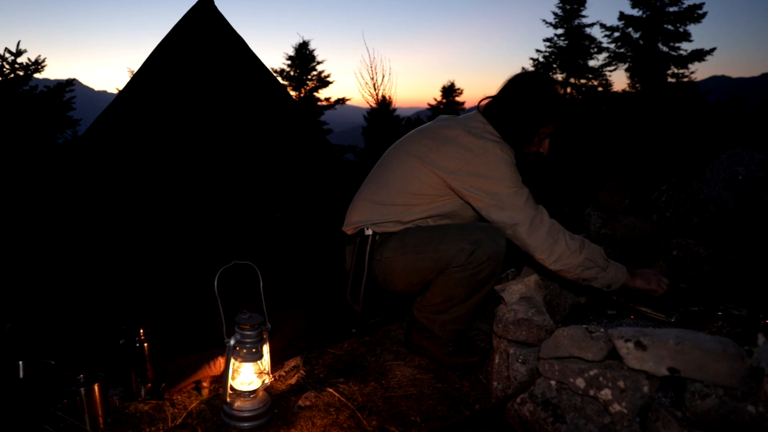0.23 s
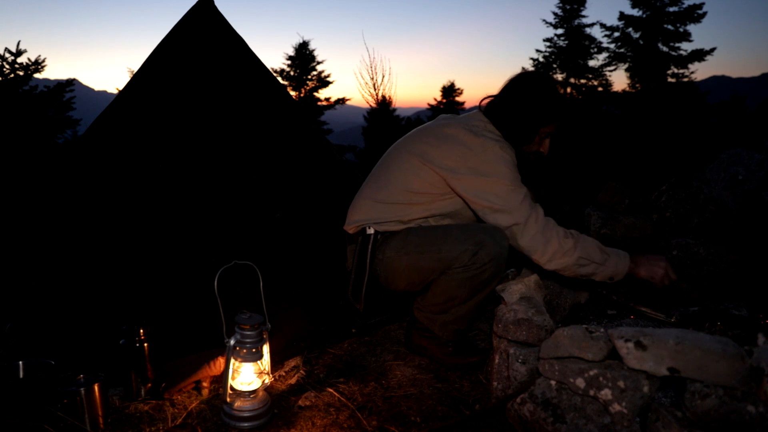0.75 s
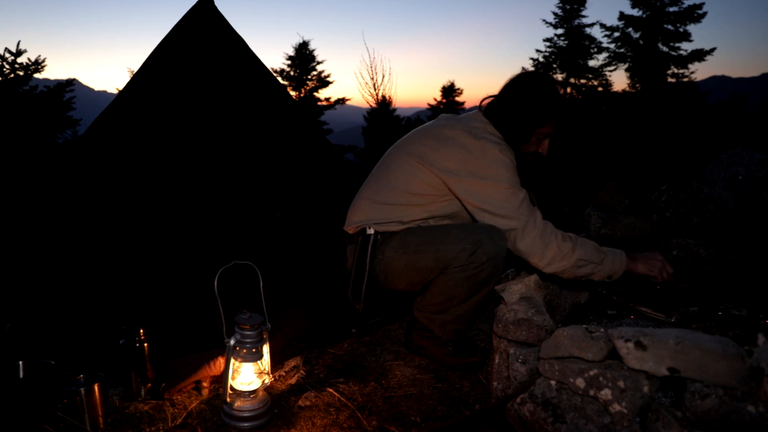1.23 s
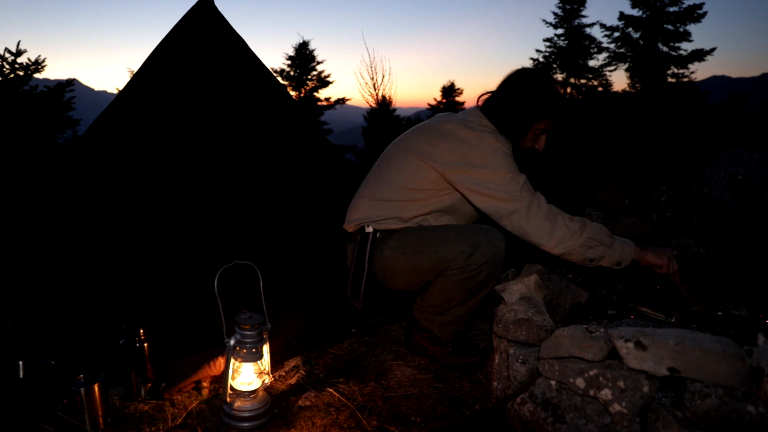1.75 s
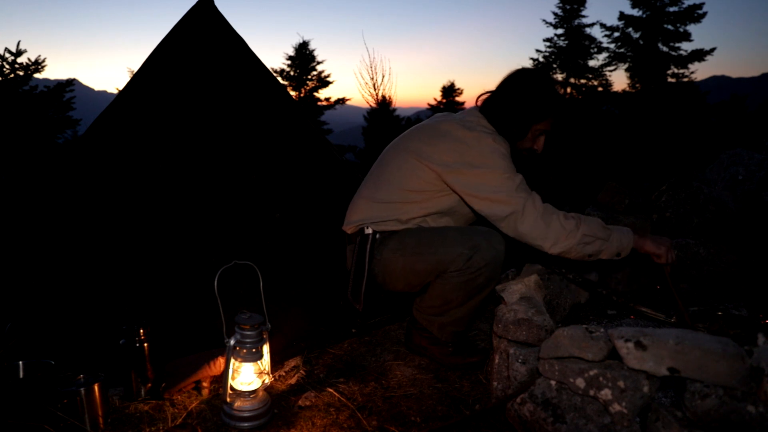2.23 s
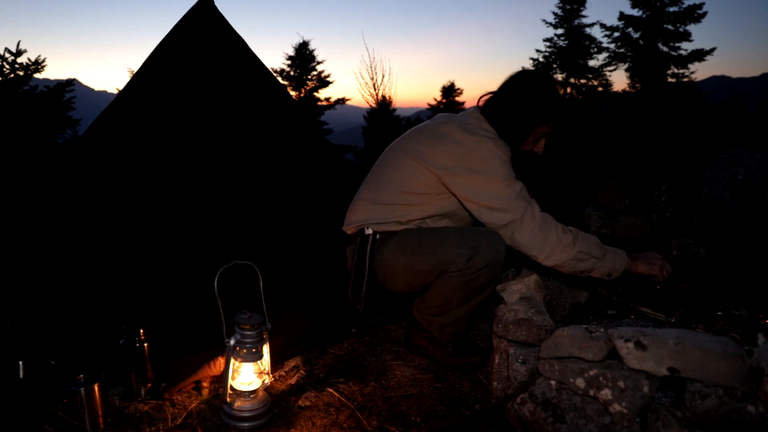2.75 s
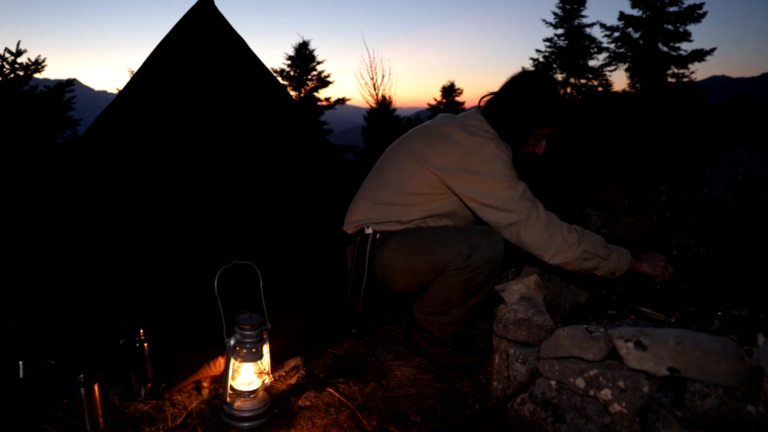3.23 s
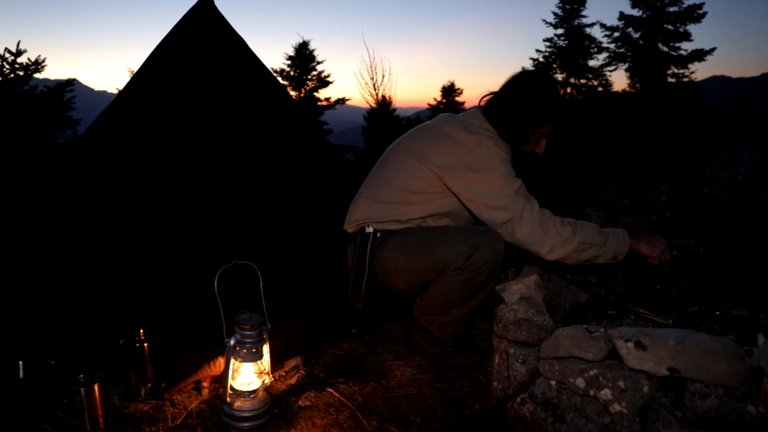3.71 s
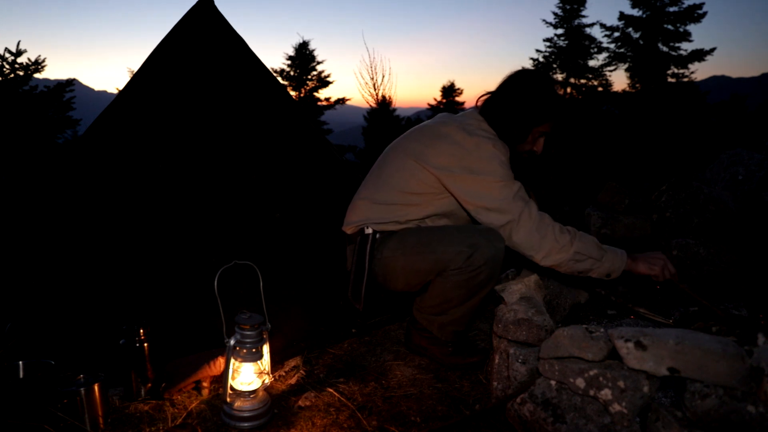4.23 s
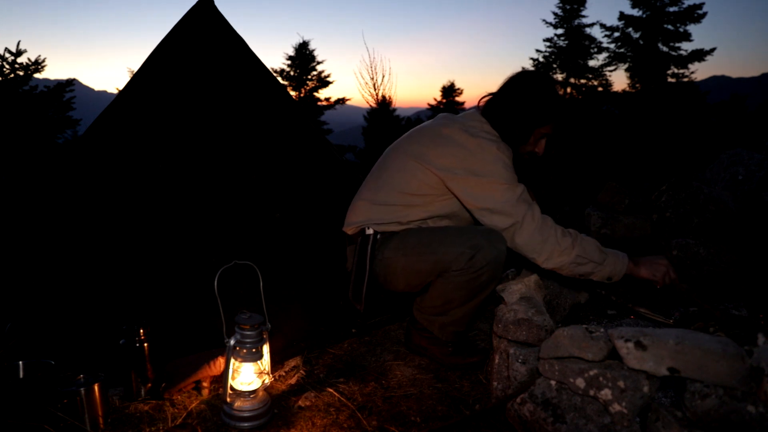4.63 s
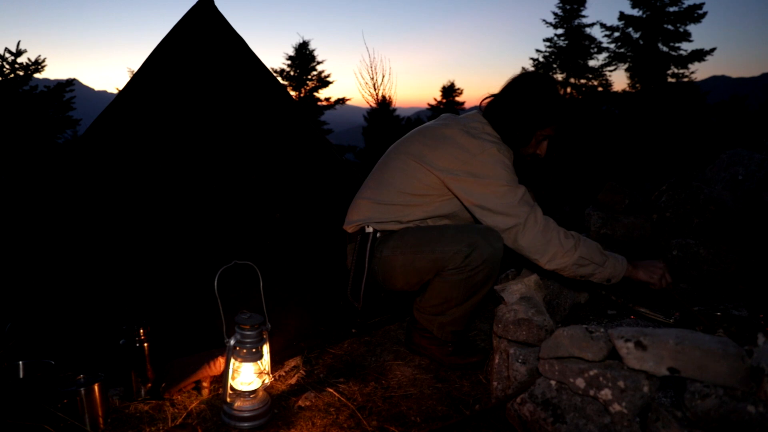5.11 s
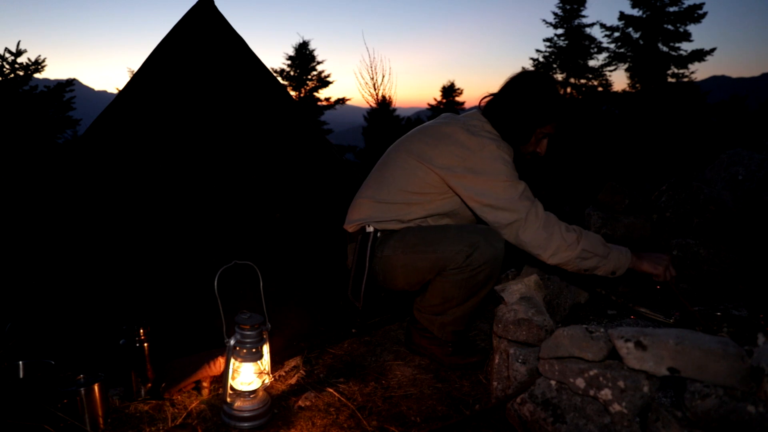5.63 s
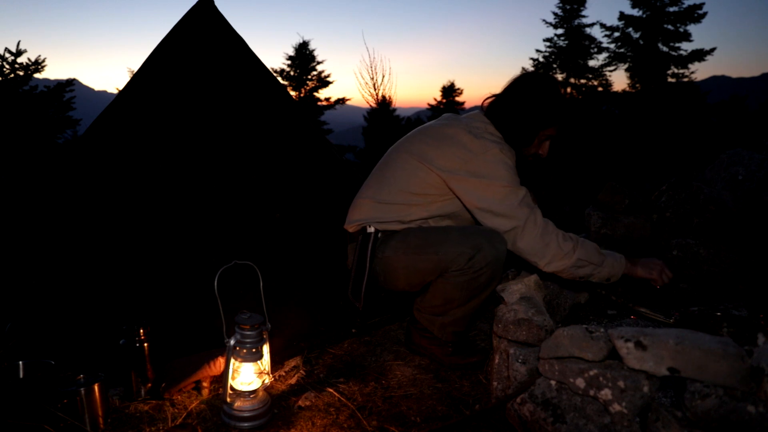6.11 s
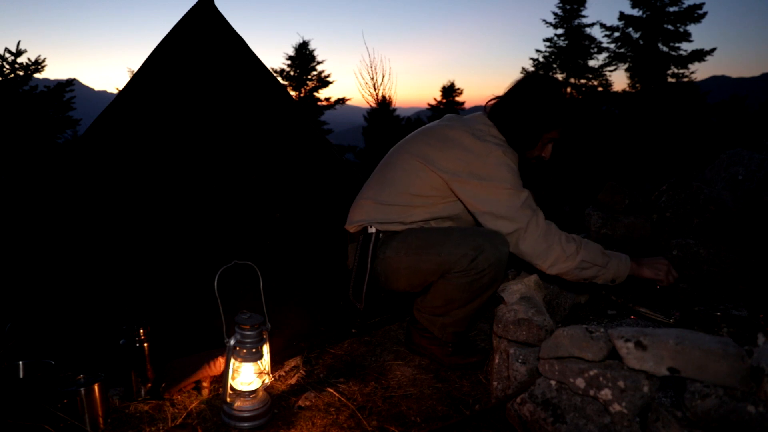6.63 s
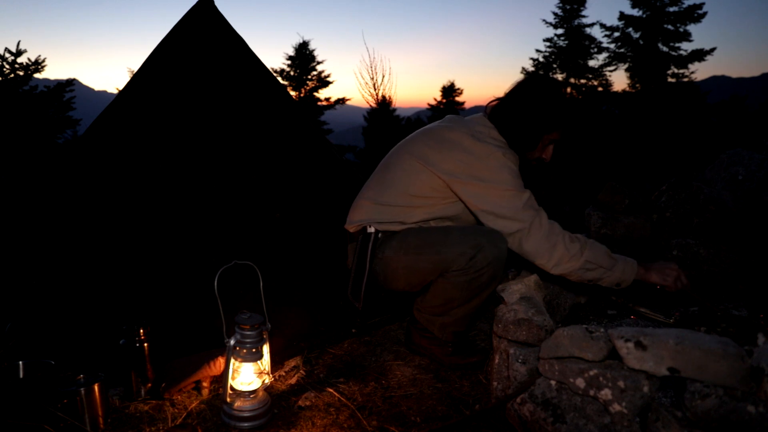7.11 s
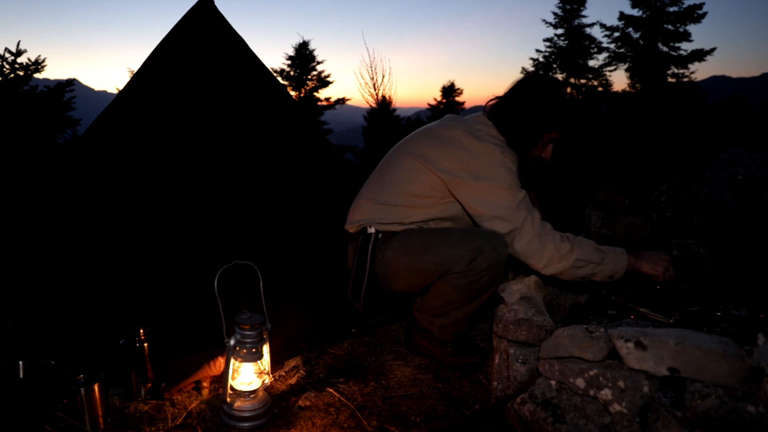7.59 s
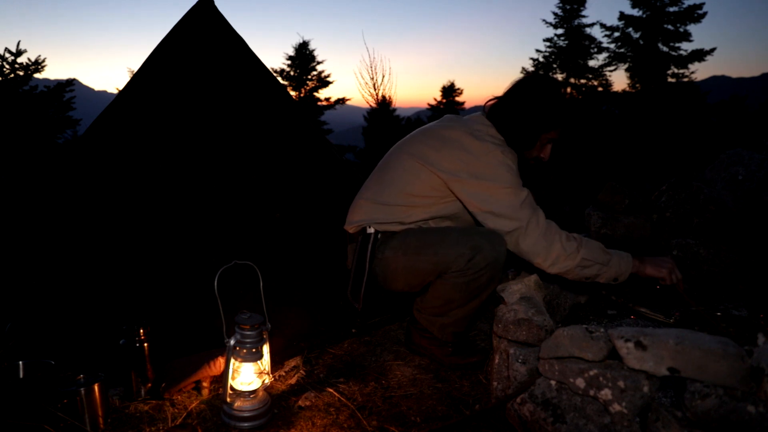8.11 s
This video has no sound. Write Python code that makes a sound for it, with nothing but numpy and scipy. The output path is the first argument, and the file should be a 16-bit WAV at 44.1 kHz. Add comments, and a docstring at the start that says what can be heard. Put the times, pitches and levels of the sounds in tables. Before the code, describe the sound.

Close, quiet frying in a small pan on campfire embers outdoors at dusk. A fine continuous sizzle swells and thins as food is stirred. Fat spits in tiny bright snaps, and a wooden spoon knocks the pan with short, damped, woody-metallic clacks and faint scrapes. Stones around the fire add a very short scatter. Low, lumpy wind rumbles softly on the microphone over faint air and hiss.

```python
"""Food fries quietly in a pan on embers, outdoors at dusk: countless random clicks merge into a fine sizzle.
Fat spits over it as short bursts of ringing noise, and a wooden spoon knocks the pan so its modes ring.
The spoon also scrapes: random slips drive wide bands around the same modes.
Knocks and spits scatter off a ring of stones. A light wind rumbles on the microphone above its own hiss."""
import sys
import numpy as np
from scipy import signal
from scipy.fft import rfft, irfft, next_fast_len
from scipy.io import wavfile
from scipy.ndimage import uniform_filter1d

SR = 44100
rng = np.random.default_rng(int(sys.argv[2]) if len(sys.argv) > 2 else 0)


def output_pcm(signal):
    """Save a mono or channel-first signal as 16-bit PCM at the path in sys.argv[1].

    Samples are clipped to [-1, 1] before scaling.
    """
    pcm = np.clip(np.atleast_2d(signal).T, -1, 1) * 32767
    wavfile.write(sys.argv[1], SR, np.round(pcm).astype(np.int16))


N = 368235  # length in samples

# ways the pan with food in it can ring (modes), before damping by the spoon:
# pitch_hz, relative level_db, t60_s (time to fall by 60 dB)
PAN_MODES = [(497, -4.5, 0.03), (623, 9.5, 0.056), (844, 9, 0.037), (937.6, 1.5, 0.044),
             (1455, -5.5, 0.099), (1570, 3.5, 0.033), (1680, 5, 0.027), (1850, -4, 0.037),
             (1958, 6.5, 0.016), (2293, 3, 0.029), (2680, 2, 0.028), (3034, 4, 0.023), (3450, 2.5, 0.019),
             (3650, 4.5, 0.013), (4060, 2, 0.02), (4420, -1, 0.02), (4990, 1, 0.018), (5330, -5, 0.033),
             (5900, 2.5, 0.016), (6760, -2.5, 0.019)]
# stirring over time: start_s, sizzle level_db, spoon drag level_db
STIRRING = [(0.0, -50.5, -66), (0.3, -55.5, -63.5), (0.9, -57.5, -61.5), (1.37, -62.5, -65),
            (1.86, -62, -59), (2.05, -53, -54.5), (2.23, -54.5, -54.5), (2.7, -60, -58), (3.0, -58.5, -60),
            (3.13, -54, -59.5), (3.75, -59, -60), (4.1, -61, -61.5), (5.7, -57.5, -65.5),
            (6.58, -55.5, -65), (6.95, -59.5, -63), (7.3, -55.5, -57.5), (8.35, -56.5, -62.5)]


def gain_of(db):
    """Turns decibels into a plain multiplier."""
    return 10 ** (np.asarray(db) / 20)


def evened(x):
    """Scales a sound to an rms (average strength) of 1."""
    return x / np.sqrt(np.mean(x ** 2) + 1e-20)


def level_over_time(rows, column):
    """Joins a table's dB column by straight lines and gives a gain for every sample."""
    columns = np.transpose(rows)
    return gain_of(np.interp(np.arange(N) / SR, columns[0], columns[column]))


def colour(x, points):
    """Filters by a spectrum of (Hz, dB) points, then scales to rms 1."""
    size = next_fast_len(N)
    point_hz, point_db = np.transpose(points)
    bin_hz = np.fft.rfftfreq(size, 1 / SR)
    shape_db = np.interp(np.log(bin_hz + 1), np.log(point_hz + 1), point_db)
    filtered = irfft(rfft(x, size) * gain_of(shape_db), size)
    return evened(filtered[..., :N])


def resonate(x, hz, width_hz):
    """A resonance with gain 1 at its peak, applied twice for steep sides; the width is that of one pass."""
    b, a = signal.iirpeak(hz, hz / width_hz, SR)
    return signal.lfilter(b, a, signal.lfilter(b, a, x))


def grains(per_s, spread_db):
    """Random clicks of either sign, most small and a few large."""
    size = gain_of(spread_db * np.minimum(rng.exponential(1, N), 5))
    size *= rng.choice([-1, 1], N)
    return size * (rng.random(N) < per_s / SR)


def add(mix, start_s, sound):
    """Adds a sound into the mix at its start time, cut where the mix ends."""
    part = mix[round(start_s * SR):][:len(sound)]
    part += sound[:len(part)]


def sizzle():
    """Countless tiny bubbles merge into hiss; sparser, larger ones crackle; brief hisses add bands."""
    # spectrum of the sizzle: pitch_hz, relative level_db
    sizzle_colour = [(800, -29), (1200, -9.5), (2600, -2), (4500, -3), (6000, 1), (7000, -5.5), (7800, -9),
                     (8900, -14), (9800, -9.5), (11500, -10), (14000, -20), (16000, -30)]
    # brief hisses in one band, from steam or a short scrape: start_s, end_s, pitch_hz, width_hz, level_db
    band_hisses = [(0, 0.945, 2810, 905, -60), (0, 0.916, 2000, 350, -64), (1.998, 3.16, 1830, 600, -65),
                   (1.968, 2.51, 5370, 1500, -60.5), (1.998, 2.586, 2600, 890, -61),
                   (2.602, 4.05, 1960, 250, -67.5), (3.4, 4.03, 3200, 1210, -58),
                   (3.497, 4.098, 1620, 600, -62.5), (4.619, 4.642, 2620, 300, -54)]
    # bands in which a run of quick small bursts rings: pitch_hz, width_hz, level_db
    sputter_bands = [(2570, 250, -66), (4220, 250, -65), (5700, 980, -67.5)]
    sputter_start_s, sputter_end_s = 4.1, 5.15
    patch_db, flare_db = 1.2, 0.8  # rms strength of the colour drift and of the quick swells

    # eight noise puffs, from brief ticks to soft puffs
    t = np.arange(600) / SR
    fade_s = np.geomspace(.0002, .0025, 8)[:, None]
    puffs = rng.standard_normal((8, len(t))) * np.exp(-t / fade_s)
    puffs /= np.linalg.norm(puffs, axis=1, keepdims=True) ** .5
    crackle = sum(signal.oaconvolve(grains(22, 2.3), puff)[:N] for puff in puffs)
    bubbles = evened(grains(9000, 1.9)) + gain_of(-1.0) * evened(crackle)
    spectrum = signal.stft(colour(bubbles, sizzle_colour), nperseg=512)[2]

    # the colour drifts as patches of food turn over: about 1 kHz by .15 s
    patches = uniform_filter1d(rng.standard_normal(spectrum.shape), size=12, axis=0)
    patches = evened(uniform_filter1d(patches, size=26, axis=1))
    # quick swells of the whole sizzle, about 40 ms long
    flares = evened(uniform_filter1d(rng.standard_normal(spectrum.shape[1]), size=7))
    spectrum = spectrum * gain_of(patch_db * patches + flare_db * flares)
    fine_hiss = evened(signal.istft(spectrum, nperseg=512)[1][:N])
    out = level_over_time(STIRRING, 1) * fine_hiss

    for start_s, end_s, hz, width_hz, db in band_hisses:
        band = resonate(grains(2000, 4.1)[:round((end_s - start_s) * SR)], hz, width_hz)
        add(out, start_s, gain_of(db) * evened(band) * signal.windows.tukey(len(band), .4))

    bursts = signal.oaconvolve(grains(70, 3.8), puffs[-3])
    bursts = bursts[:round((sputter_end_s - sputter_start_s) * SR)]
    sputter = sum(gain_of(db) * evened(resonate(bursts, hz, width_hz)) for hz, width_hz, db in sputter_bands)
    add(out, sputter_start_s, sputter)
    return out


def spits():
    """A snap, then noise that rings where the bubble of fat bursts; brief ones are broad ticks."""
    # the loudest spits of fat: start_s, peak level_db, centre pitch_hz, t60_s of the noise
    loud_spits = [(0.1274, -43, 6400, .005), (0.1735, -36, 2620, 0.0088), (0.6714, -39, 5800, .005),
                  (0.7689, -41, 9000, .002), (0.7938, -43, 2580, 0.0089), (0.9331, -36, 4090, .003),
                  (0.9785, -27.5, 5900, .002), (1.588, -37.5, 2540, 0.057), (1.9894, -39.5, 2430, 0.023),
                  (2.0697, -40, 2680, .02), (2.3704, -37, 3010, .009), (3.276, -37, 5980, .007),
                  (3.5088, -38, 3140, .007), (3.565, -39, 1940, 0.017), (3.647, -35, 5680, 0.015),
                  (3.6612, -34, 5500, 0.0097), (3.7088, -34, 3140, 0.012), (3.8528, -30, 3940, 0.01),
                  (4.115, -36, 5200, .008), (4.3238, -37, 4210, .009), (4.346, -41, 5850, 0.014),
                  (4.3903, -36.5, 4270, 0.0098), (4.4736, -37, 4280, 0.0055), (4.483, -38.5, 4200, .012),
                  (5.0953, -36.5, 4370, 0.019), (5.2098, -38, 10960, .003), (5.2355, -33, 4140, 0.01),
                  (5.421, -43, 6490, .02), (5.4525, -38.5, 5850, .018), (5.501, -38.5, 5800, .022),
                  (6.1445, -38, 6670, .003), (6.3103, -31, 5680, 0.0037), (6.5295, -36, 4200, 0.017),
                  (6.9255, -34, 6440, 0.012), (7.0277, -36, 5680, .012), (7.4205, -36, 5630, .008),
                  (7.8615, -24, 4100, 0.0059), (8.038, -41, 6300, 0.02)]
    small_count, small_db, small_spread_db = 110, -47, 5  # smaller spits fall at random
    low_hz, high_hz = 3500, 7500
    brief_s, long_s = 0.0017, 0.0095  # t60 range of the small spits
    cycles_width = 17  # ring width in Hz x t60: long spits ring in a narrower band

    out, t = np.zeros(N), np.arange(2500) / SR
    when, size, pitch, span = rng.random((small_count, 4)).T
    small_spits = zip(when * (N - len(t)) / SR,
                      small_db + small_spread_db * size,
                      low_hz * (high_hz / low_hz) ** pitch,
                      brief_s * (long_s / brief_s) ** span)
    for start_s, db, hz, t60 in [*loud_spits, *small_spits]:
        noise = rng.standard_normal(len(t))
        noise[0] = 3.3  # the burst opens with a snap
        noise *= gain_of(-60 * t / t60)
        ring = evened(resonate(noise, hz, min(cycles_width / t60, hz)))
        broad = evened(resonate(noise, 4600, 7300))
        burst = ring + 0.67 * broad
        add(out, start_s, gain_of(db) * burst / abs(burst).max())
    return out


def knocks():
    """Each blow rings the pan's modes around its thud and its click; contact noise roughens and brightens it."""
    # spoon on pan, a dull thud and a bright click centred where place and angle put them:
    # start_s, thud_hz, thud_db, quiet gap_hz, favoured mode_hz, its lead_db, click_hz, click_db, rebound_ms
    blows = [(0.2725, 1515, -38.5, 3500, 1900, 17, 4940, -38.5, 1.55),
             (0.332, 880, -54, 3000, 1990, 11, 4730, -51, 2.76),
             (1.0797, 790, -48.5, 1660, 950, 9, 4800, -33.5, 1.6),
             (1.101, 950, -54, 1500, 3600, 5, 3500, -31.5, 1.08),
             (1.288, 910, -52, 5330, 2007, 10, 4330, -41.5, 0.99),
             (1.5402, 908, -31, 2170, 1570, 12, 5550, -30, 2),
             (1.597, 1500, -45.5, 3500, 2010, 13, 5450, -40.5, 1.9),
             (1.8183, 1530, -28.5, 5400, 1910, 11.5, 6090, -27, .66),
             (1.833, 1460, -41.5, 600, 1435, 9, 2540, -68, 1.56),
             (1.942, 714, -50.5, 3000, 673, 7, 5000, -67, 1.07),
             (2.356, 1010, -51.5, 3600, 1880, 10, 5400, -45, 1.5),
             (3.529, 810, -52.5, 2300, 860, 4, 3380, -49, 2.64),
             (4.5719, 720, -37, 2170, 1610, -1, 3450, -37, 1.62),
             (4.9637, 2300, -49, 5700, 3090, 3.5, 3690, -21, 1.636),
             (4.981, 1800, -45.5, 4600, 1870, 12, 3100, -36.5, 1.5),
             (5.5555, 1800, -45.5, 1960, 3437, 4, 3140, -34.5, .3),
             (6.2246, 930, -33, 2970, 1680, 13.5, 3610, -31.5, 1.8),
             (6.6146, 880, -30.5, 2550, 1540, 1.5, 4250, -35, 0.87),
             (6.9947, 990, -35.5, 3080, 1850, 14.5, 2570, -30.5, 1.08),
             (7.3398, 912, -32.5, 2800, 1480, -1, 4670, -39, 2.2)]
    favour_db, favour_octaves = 5.5, 0.043  # the modes at a centre stand out
    gap_db, gap_octaves = -10, 0.17  # modes with a node (still point) under the spoon stay quiet
    # how fast modes weaken below and above a centre, in dB per octave
    thud_fall_db, click_fall_db = (7.5, 8.5), (14.5, 10.5)
    # heavier thuds press on the pan and ring shorter
    base_damping, damping_per_db, firm_db = 1.79, 0.0239, -52.5
    hold_s = 0.0051  # the ring holds while the spoon rebounds, then dies at full speed
    detune = 0.006  # shifting food moves each mode a little from blow to blow
    tick_hz, tick_db = 7500, 4.5  # contact tick above the modes, louder the higher the click lies
    rebound_share = 0.32  # share of the blow that comes again

    out, t = np.zeros(N), np.arange(3500) / SR
    hz, db, t60 = np.transpose(PAN_MODES)[:, :, None]
    noises = rng.standard_normal((len(blows), len(t)))
    held_s = t ** 2 / (t + hold_s)
    shifts = 1 + detune * rng.standard_normal((len(blows), len(PAN_MODES), 1))

    def bump(centre_hz, octaves):
        """1 at the centre, falling smoothly to 0 on both sides."""
        return np.exp(-(np.log2(hz / centre_hz) / octaves) ** 2)

    def reach(centre_hz, centre_db, below_db, above_db):
        """How strongly a hit at one centre drives each mode."""
        away = np.log2(hz / centre_hz)
        fall_db = np.maximum(above_db * away, -below_db * away)
        return gain_of(centre_db - fall_db + favour_db * bump(centre_hz, favour_octaves))

    for row, noise, shift in zip(blows, noises, shifts):
        start_s, thud_hz, thud_db, gap_hz, mode_hz, lead_db, click_hz, click_db, rebound_ms = row
        size = reach(thud_hz, thud_db, *thud_fall_db) + reach(click_hz, click_db, *click_fall_db)
        size *= gain_of(lead_db * bump(mode_hz, favour_octaves) + gap_db * bump(gap_hz, gap_octaves))

        damping = base_damping + damping_per_db * (thud_db - firm_db)
        fading = gain_of(db - 60 * held_s * damping / t60)
        ring = (size * fading * np.sin(2 * np.pi * hz * shift * t)).sum(0)

        contact = gain_of(-22.5) * noise * np.exp(-t / 0.00098)
        contact[0] = 1  # lets the clean ring through
        rough_ring = signal.fftconvolve(ring, contact)[:len(t)]
        onset = np.minimum(t / 0.00067, 1) ** 2

        tick_level_db = click_db + tick_db - click_fall_db[1] * np.log2(tick_hz / click_hz)
        tick = gain_of(tick_level_db) * resonate(noise, tick_hz, 4500) * np.exp(-t / 0.0034)
        blow = rough_ring * onset + tick
        add(out, start_s, blow)
        add(out, start_s + rebound_ms / 1000, rebound_share * blow)
    no_bass = signal.butter(2, 300, "high", fs=SR, output="sos")  # a small pan radiates no bass
    return signal.sosfilt(no_bass, out)


def scrape():
    """Wood slips unevenly over the pan floor; the pressing spoon widens the pan's modes into bands."""
    # centres of the four families of modes: pitch_hz
    family_centres = [800, 1700, 3400, 5800]
    # how much the drag drives each family: relative level_db
    family_levels = [-7, -2, -3, -8]
    # short dull scuffs of food pushed along: start_s, length_s, level_db, pitch_hz
    scuffs = [(0.33, 0.13, -60, 790), (1.551, 0.026, -50, 800), (1.837, 0.032, -53, 950),
              (4.599, 0.048, -56, 805), (6.626, 0.057, -53.5, 650), (6.671, 0.049, -52.5, 830),
              (6.687, 0.054, -53, 1050)]

    slips, out = grains(3000, 5.2), np.zeros(N)
    modes = np.array(PAN_MODES)
    distance = np.abs(np.log(modes[:, :1] / family_centres))
    family = distance.argmin(axis=1)  # each mode joins the nearest centre
    drag = level_over_time(STIRRING, 2)
    for k, family_db in enumerate(family_levels):
        bands = sum(gain_of(0.35 * db) * resonate(slips, hz, 120 + 0.08 * hz)
                    for hz, db, t60 in modes[family == k])
        out += gain_of(family_db) * drag * evened(bands)

    for start_s, length_s, db, hz in scuffs:
        rub = resonate(grains(2500, 2.6)[:SR // 4], hz, 550)[:round(length_s * SR)]
        add(out, start_s, gain_of(db) * evened(rub) * signal.windows.tukey(len(rub), .6))
    return out


def stones(x):
    """The ring of stones and the ground throw back a short scatter."""
    t = np.arange(3000) / SR
    shared, left, right = rng.standard_normal((3, len(t)))
    echoes = shared + 0.0034 * np.array([left, right])
    echoes = echoes * gain_of(-60 * t / 0.032) * (t > .003)  # from 3 ms on, t60 32 ms
    return signal.oaconvolve(x[None], echoes / np.linalg.norm(echoes[0]), axes=1)[:, :N]


def wind():
    """Lumpy low rumble on the microphone over the faint steady air."""
    # rumble over time: start_s, level_db
    rumble_level = [(0.0, -53), (1.49, -56.5), (1.72, -46.5), (5.14, -68.5), (7.63, -46), (7.7, -61.5),
                    (8.35, -52)]
    # spectrum of the rumble: pitch_hz, relative level_db
    rumble_colour = [(8.8, -23), (15, 0), (36, 0.5), (86, -3), (217, -25), (650, -64), (1100, -120)]
    # spectrum of still outdoor air: pitch_hz, relative level_db
    air_colour = [(12, -18), (20, -10), (86, -4), (198, -3.5), (574, -11), (2020, -23), (3070, -47),
                  (5850, -21.5), (16000, -27.5)]
    air_db = -60

    lumps = gain_of(2.8 * evened(uniform_filter1d(rng.standard_normal(N), 2500)))
    rumble = evened(colour(rng.standard_normal(N), rumble_colour) * lumps)
    gusts = level_over_time(rumble_level, 1) * rumble
    return gusts + gain_of(air_db) * colour(rng.standard_normal(N), air_colour)


def scene():
    """Mixes the frying, the spoon and the wind; only knocks and spits echo from the stones."""
    hits = knocks() + spits()
    return hits + gain_of(-12.0) * stones(hits) + sizzle() + scrape() + wind()


def record(dry):
    """Adds the microphone's hiss, separate noise in each channel, then cuts the highest treble."""
    # spectrum of the hiss: pitch_hz, relative level_db
    hiss_colour = [(12, -26), (20, 10), (678, -1), (1150, -10), (1440, -24), (4540, -33), (13900, -2),
                   (16000, -18)]
    hiss_db, edge_hz = -75, 15800
    hiss = gain_of(hiss_db) * colour(rng.standard_normal((2, N)), hiss_colour)
    low_pass = signal.firwin(511, edge_hz, window=("kaiser", 9), fs=SR)
    return signal.oaconvolve(dry + hiss, low_pass[None], "same")


dry = scene()
out = record(dry)
output_pcm(out)
```